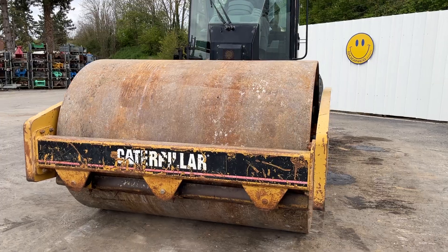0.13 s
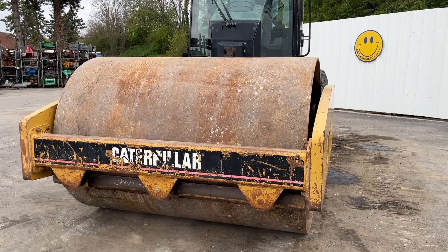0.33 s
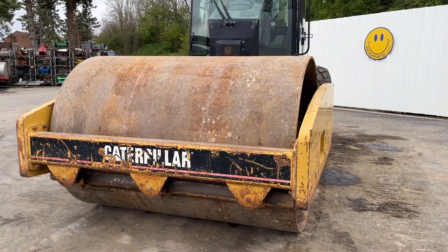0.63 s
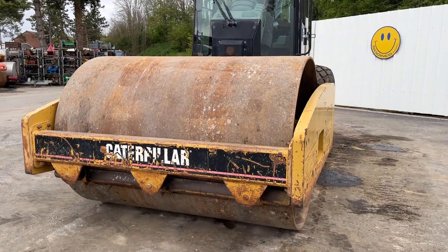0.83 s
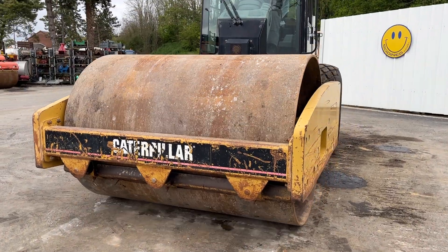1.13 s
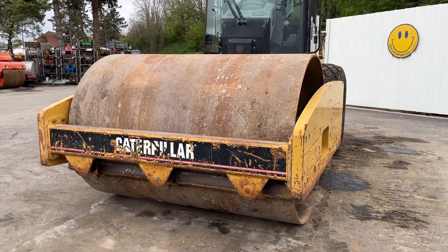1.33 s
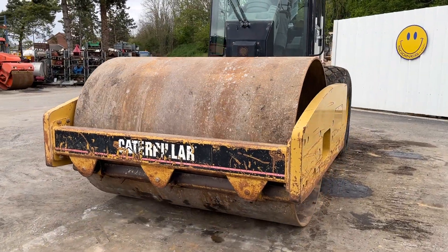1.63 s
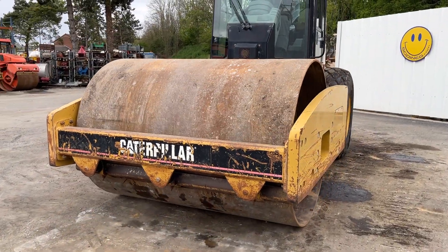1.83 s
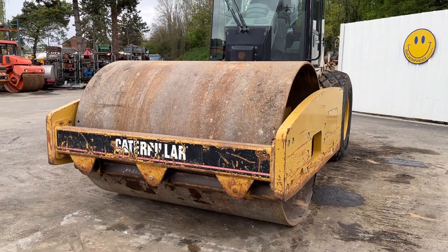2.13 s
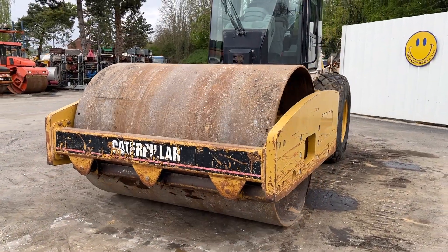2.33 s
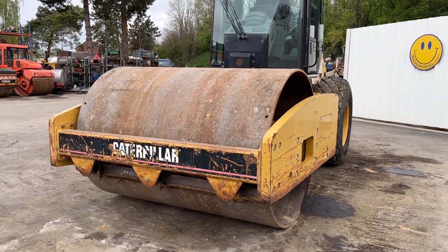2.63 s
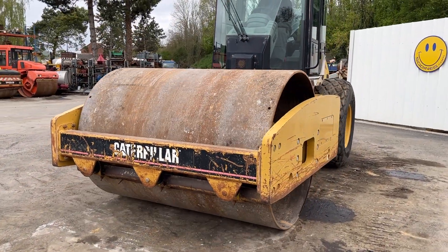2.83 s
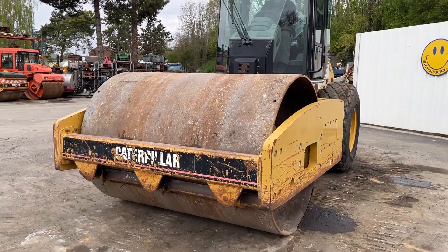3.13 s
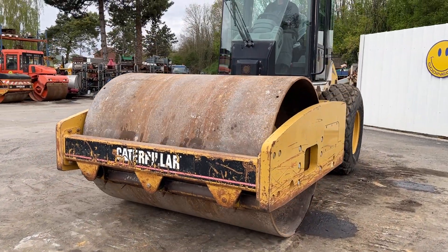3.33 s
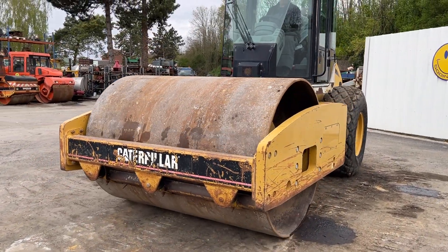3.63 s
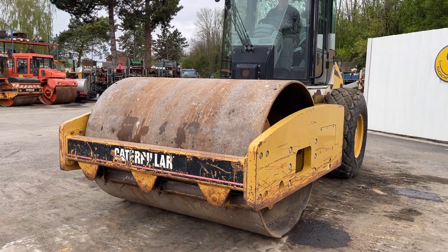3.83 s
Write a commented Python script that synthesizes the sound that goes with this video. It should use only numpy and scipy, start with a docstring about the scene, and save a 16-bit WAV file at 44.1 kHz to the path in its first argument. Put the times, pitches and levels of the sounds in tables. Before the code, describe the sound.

Close outdoor stereo pickup of a heavy roller: quiet steady engine first, small stone ticks midway, then a sudden rush of hollow metallic booming, ringing thuds, crunching stones and deep frame shudder until the end.

```python
"""A diesel road roller creeps over a concrete yard, close to the microphone.
First its engine and hydraulic pump hum and sag a little as they take the load: sines locked to one shaft,
with noisy clatter. From 1.7 s a pebble knocks and grit pops; just before 3 s the drum groans.
Near 3 s the hollow steel drum reaches rough ground: random grains, bumps and cracking stones drive
its decaying modes, so it booms and rings, while the heavy frame shudders and heaves."""
import sys
import numpy as np
from scipy import signal
from scipy.fft import rfft, irfft
from scipy.io import wavfile

SR = 44100
rng = np.random.default_rng(int(sys.argv[2]) if len(sys.argv) > 2 else 0)


def generate_wav(signal):
    """Clip the signal to [-1, 1] and save it as 16-bit WAV at the path in sys.argv[1]."""
    frames = np.transpose(np.atleast_2d(signal))
    scaled = np.clip(frames, -1, 1) * 32767
    pcm = np.round(scaled).astype(np.int16)
    wavfile.write(sys.argv[1], SR, pcm)


N = 176400
T = np.arange(N) / SR


def amp(db):
    """Decibels to gain."""
    return 10 ** (np.asarray(db) / 20)


def evened(x):
    """Scales to rms 1."""
    return x / np.sqrt(np.mean(x ** 2) + 1e-20)


def unit(x):
    """Scales a response to energy 1 per channel, on average."""
    return evened(x) / np.sqrt(x.shape[-1])


def curve(rows, axis=1):
    """One column of a time table, at every sample."""
    rows = np.array(rows)
    return np.interp(T, rows[:, 0], rows[:, axis])


def read(points, hz):
    """Reads a spectrum on a log-frequency axis."""
    f, value = np.transpose(points)
    return np.interp(np.log(hz + 1), np.log(f + 1), value)


def drift(hz):
    """Slow random motion, mostly below the given rate."""
    f = np.fft.rfftfreq(N, 1 / SR)
    return evened(irfft(rfft(rng.standard_normal(N)) / (1 + (f / hz) ** 4), N))


def through(x, response):
    """Plays a signal through a one- or two-channel response."""
    return signal.fftconvolve(np.atleast_2d(x), np.atleast_2d(response), axes=1)[:, :N]


def colour(x, points, size=4096):
    """Causal minimum-phase filter with the given spectrum."""
    log_gain = np.log(amp(read(points, abs(np.fft.fftfreq(size, 1 / SR)))))
    minimum_phase = np.exp(np.conj(signal.hilbert(log_gain)))
    return through(x, np.fft.ifft(minimum_phase).real[:size // 2])


# likeness of the noise at the two microphone ports: pitch_hz, likeness (0 to 1)
PORT_LIKENESS = [(60, 1), (170, 0.86), (370, 0.51), (930, 0.38), (2320, 1), (5800, 0.49), (14500, 0.5)]


def pair(size):
    """Noise at the two ports, alike in the bass and by varying degrees higher up."""
    a, b = rfft(rng.standard_normal((2, size)))
    same = np.clip(read(PORT_LIKENESS, np.fft.rfftfreq(size, 1 / SR)), 0, 1)
    return irfft(np.array([a, same * a + np.sqrt(1 - same ** 2) * b]), size)


def wash(points, t60, direct, size=12000):
    """A direct click and a dense dying tail, with the given spectrum."""
    tail = unit(pair(size) * amp(-60 * T[:size] / t60))
    tail[:, 0] += direct
    return unit(colour(tail, points))


def ring(modes, port_turn=0.06, size=20000):
    """Sum of dying modes, slightly out of step at the two ports; dB is a mode's share of the energy."""
    t, ports = T[:size], np.array([[1], [-1]])
    total = 0
    for k, (hz, db, t60) in enumerate(modes):
        turn = ports * port_turn * rng.standard_normal()  # radians
        attack = 1 - np.exp(-t * hz * 2)
        mode = np.sin(2 * np.pi * hz * t + turn) * attack * amp(-60 * t / t60)
        total = total + (-1) ** k * amp(db) * unit(mode)  # neighbours start with opposite signs
    return unit(total)


def grains(per_s, spread_db):
    """Random clicks of uneven size and either sign, at rms 1."""
    size = amp(spread_db * np.minimum(rng.exponential(1, N), 3))
    return evened(size * rng.choice([-1, 1], N) * (rng.random(N) < per_s / SR))


def bursts(rows, length_s, size=1500):
    """A short crumbling burst of force for each row, made of many tiny fractures."""
    fractures_per_s = 9000
    force = np.zeros(N + size)
    for s, db in rows:
        at = int(s * SR)
        fractures = rng.standard_normal(size) * (rng.random(size) < fractures_per_s / SR)
        force[at:at + size] += amp(db) * evened(fractures * np.exp(-T[:size] / length_s))
    return force[:N]


def pushes(rows, length_s, size=200):
    """One clean, brief push for each row, dying exponentially."""
    force = np.zeros(N)
    for s, db in rows:
        force[int(s * SR)] += amp(db)
    return through(force, np.exp(-T[:size] / length_s) / (length_s * SR))[0]


# exhaust note at the firing rate: time_s, level_db
EXHAUST = [(0, -46.5), (.6, -48.5), (1.3, -54), (1.7, -52.5), (2.3, -55), (4, -22.5)]


def exhaust_note(turn, flutter=0.19):
    """One sine per firing, its strength fluttering."""
    return amp(curve(EXHAUST)) * evened(np.sin(turn) * (1 + flutter * drift(30)))


# weaker engine orders: order (multiples of the four-stroke cycle), level_db before the approach
ORDERS = [(7, -65.5), (8, -66), (10, -64), (11, -66.5), (12, -66.5), (18, -71.5), (36, -65.5), (51, -69.5),
          (54, -69.5), (72, -65)]


def engine_orders(cycle, flutter=0.31, twist_rad=.008):
    """Harmonics of the whole engine cycle, wavering in phase with random shaft twist and in strength."""
    total = 0
    for k, db in ORDERS:
        phase = round(k) * (cycle + twist_rad * drift(10)) + 2 * np.pi * rng.random()
        total = total + amp(db) * evened(np.sin(phase) * (1 + flutter * drift(10)))
    return total


# colour of the clatter: pitch_hz, level_db per Hz (relative)
CLATTER = [(18, -90), (30, -43.5), (57, -4.5), (81, -15.5), (104, -15.5), (139, -16), (303, -12.5),
           (363, -3), (393, -31), (695, -19.5), (772, -19), (1330, -13.5), (5270, -52.5), (8200, -37),
           (14900, -52)]


def engine_clatter(turn, cycle, gating=0.053):
    """Noise pulsing gently with each firing and each full cycle."""
    pulse = 1 + gating * np.cos(turn) + 0.13 * np.cos(cycle)
    return amp(-54) * evened(colour(pair(N) * pulse, CLATTER))


# harmonics of the pump whine from the first up: level_db before the swell
PUMP_HARMONICS = [-59.5, -61, -62.5, -66.5]
# the pump's whine swells with its load: time_s, gain_db
PUMP_SWELL = [(0, -1), (.6, -2), (.9, 0), (1.5, -2)]


def pump_whine(turn, per_firing=4.79):
    """The hydraulic pump turns with the engine and whines at a fixed multiple of the firing rate."""
    whine = 0
    for k, db in enumerate(PUMP_HARMONICS, 1):
        whine = whine + amp(db) * evened(np.sin(k * per_firing * turn) * (1 + 0.31 * drift(1.0)))
    return amp(curve(PUMP_SWELL)) * whine


# engine speed: time_s, firings_per_s
FIRING = [(0, 76.4), (.62, 72.8), (1.09, 75.3), (1.55, 74.2), (1.9, 73.6), (4, 73.6)]
# the engine block as the machine comes nearer: time_s, gain_db
NEAR = [(0, -0.5), (1.3, 1.5), (2, 5), (2.5, 9.5), (3, 15.5), (4, 21.5)]


def engine(waver=0.0018, cylinders=4):
    """Exhaust note, engine orders, clatter at each firing and the pump's whine, all on one shaft."""
    turn = 2 * np.pi * np.cumsum(curve(FIRING) * (1 + waver * drift(13.0))) / SR
    cycle = turn / cylinders
    block = engine_orders(cycle) + engine_clatter(turn, cycle)
    return exhaust_note(turn) + pump_whine(turn) + amp(curve(NEAR)) * block


# small sharp pops of grit: start_s, force_db
POPS = [(1.725, -64), (1.753, -63), (2.192, -62.5), (2.394, -58.5), (3.309, -54.5), (3.355, -51),
        (3.708, -48)]
# colour of a pop: pitch_hz, level_db per Hz (relative)
POP_COLOUR = [(1000, -20), (3000, -15.5), (5200, 2.5), (7000, -1.5), (11000, 4), (15000, -16)]


def pops():
    """Tiny stones shatter brightly without moving the drum."""
    return through(bursts(POPS, length_s=0.0029), wash(POP_COLOUR, t60=.06, direct=1.6)) * amp(-3.0)


# mode of the drum under the pebble: pitch_hz, level_db, t60_s
KNOCK_MODES = [(702, 0, 0.11)]


def pebble_knock(push_s):
    """One early pebble knocks on the drum: a brief push rings a single mode."""
    at_s, force_db = 1.739, -11
    return through(pushes([(at_s, force_db)], push_s), ring(KNOCK_MODES))


# the drum groans as it meets rough ground: start_s, length_s, force_db
GROANS = [(2.715, .022, -37), (2.82, 0.028, -34), (2.878, 0.053, -30.5), (2.927, .08, -31.5)]


def groan(damping=3):
    """Short spells of grinding excite the drum's middle modes, damped to ring shorter."""
    low_hz, high_hz = 650, 900
    modes = [(hz, db, t60 / damping) for hz, db, t60 in RING_MODES if low_hz < hz < high_hz]
    spells = sum(amp(db) * ((T > s) & (T < s + length)) for s, length, db in GROANS)
    return through(grains(per_s=1500, spread_db=3) * spells, ring(modes))


# modes of the frame: pitch_hz, level_db, t60_s
FRAME_MODES = [(49.4, -7.5, 1), (73.2, 0, 0.63), (98.7, -5, 0.087), (119.2, -3, 0.081)]
# shudder of the heavy frame: time_s, level_db
SHUDDER = [(0, -75), (2.78, -54), (3.25, -25), (4, -27)]


def frame_shudder(ground):
    """The rough ground shakes the deep modes of the heavy frame."""
    return evened(through(ground, ring(FRAME_MODES))) * amp(curve(SHUDDER))


# jolts of the frame: centre_s, peak_db
JOLTS = [(2.934, -28), (2.98, -27.5), (3.03, -26.5), (3.084, -19.5), (3.137, -14.5), (3.192, -18),
         (3.646, -10), (3.692, -9.5), (3.847, -11), (3.893, -9.5)]


def jolts(hz=71, width_s=0.0083):
    """The heavy frame heaves for a cycle or two each time the drum lurches."""
    total = 0
    for s, db in JOLTS:
        t = T - s
        total = total + amp(db) * np.exp(-(t / width_s) ** 2) * np.cos(2 * np.pi * hz * t)
    return total


# colour of crushed stone: pitch_hz, level_db per Hz (relative)
CRUSH = [(200, 1.5), (700, 12), (1700, 5.5), (3200, -3.5), (3900, -11), (5600, -11), (7200, -17),
         (11000, -27.5), (15000, -33.5)]
# bright modes of the rim: pitch_hz, level_db, t60_s
RIM_MODES = [(2270, -1, 0.1), (2775, -1, 0.082), (2938, 0, 0.056), (2055, 0, .04)]


def crushed_stones(grit, cracks):
    """Grit and cracking stones crunch in a short wash; the cracks also ring the drum's rim."""
    crunch = through(grit + cracks, wash(CRUSH, t60=0.097, direct=0.66))
    return crunch + amp(-9) * through(cracks, ring(RIM_MODES))


# colour of the drum's many crowded modes: pitch_hz, level_db per Hz (relative)
SHELL = [(60, -19), (170, 3), (260, 4.5), (420, 1), (600, -2.5), (780, 2), (1050, -8.5), (1350, -8),
         (1750, -27.5), (3000, -34.5), (6000, -51), (15000, -65.5)]


def drum_shell(rolling):
    """The drum's modes crowd together into a very short wash."""
    return amp(-3) * through(rolling, wash(SHELL, t60=0.02, direct=0.84))


# high modes of the drum: pitch_hz, level_db, t60_s
RING_MODES = [(464.7, -0.5, 0.11), (523, -5, 0.4), (569, -19.5, 0.27), (666.7, 1, 0.2), (717.5, -3, 0.097),
              (736.8, 4, 0.25), (845.4, 2, 1), (932, -3.5, 0.64), (956.3, -9.5, 0.12), (1115, -7, 0.1),
              (1274, -13, 0.25), (1492, -18, 0.23)]


def drum_ring(rolling, snaps):
    """Rolling and the snap of each bump ring the hollow steel."""
    return amp(-2) * through(rolling + amp(19) * snaps, ring(RING_MODES))


# low modes of the drum: pitch_hz, level_db, t60_s
BOOM_MODES = [(230.4, 0.5, 0.25), (247, -1, 0.2), (271.8, -3, .16), (303, -6.5, 0.13), (325.1, 1, 0.26),
              (338, -2, 0.12)]


def drum_boom(rumble, drops):
    """Rolling and the drop of each bump boom in the drum's low modes."""
    return through(rumble + amp(24.5) * drops, ring(BOOM_MODES))


def sweep(size=4000):
    """Bending waves in steel bring the treble first, so each bump chirps downwards."""
    from_hz, to_hz, fall_s, decay_s = 1350, 290, .005, .007
    t = T[:size]
    hz = to_hz + (from_hz - to_hz) * np.exp(-t / fall_s)
    return unit(np.sin(2 * np.pi * np.cumsum(hz) / SR) * np.exp(-t / decay_s))


# colour of one bump's thud: pitch_hz, level_db per Hz (relative)
THUD = [(80, -30), (260, -6), (500, 3.5), (850, 5), (1300, -11), (1800, -45.5), (4000, -43), (15000, -65.5)]


def bump_thuds(snaps):
    """Each snap gives a dull, quickly dying thud and a falling chirp."""
    thud = amp(23) * through(snaps, wash(THUD, t60=0.022, direct=5.3))
    return thud + amp(23) * through(snaps, sweep())


# bumps of the drum over stones: start_s, snap_db, boom_db (both as force)
BUMPS = [(3.064, -18, -12.5), (3.12, -17.5, -16), (3.175, -16.5, -8), (3.217, -20, -11.5),
         (3.256, -17.5, -9), (3.304, -20, -12.5), (3.365, -16.5, -10.5), (3.399, -15, -11.5),
         (3.44, -18.5, -31), (3.483, -23, -27), (3.536, -13.5, -6.5), (3.578, -26.5, -10),
         (3.661, -19.5, -7), (3.76, -20, -12.5), (3.831, -20.5, -20.5), (3.924, -15.5, -7.5)]


def pressure():
    """Each bump presses the drum harder on the ground; between bumps it rides light."""
    light, hard, decay_s = .5, 1.3, .014
    press = sum((T >= s) * np.exp(-abs(T - s) / decay_s) for s, _, _ in BUMPS)
    return np.where(T < BUMPS[0][0], 1, light + hard * press)


# rolling of the drum: time_s, boom_db, ring_db, grit_db (all as force)
ROLL = [(0, -104, -62, -58.5), (1.5, -72, -68.5, -58), (2.6, -53.5, -51.5, -48.5),
        (2.85, -44.5, -44, -45.5), (3.16, -19.5, -22.5, -45.5), (3.55, -15.5, -22, -41),
        (4, -16, -16.5, -51.5)]
# stones cracking under the drum: start_s, force_db
CRACKS = [(1.725, -56.5), (1.740, -55), (1.753, -53.5), (1.875, -55.5), (2.192, -59), (2.880, -46),
          (2.931, -46.5), (3.035, -48), (3.083, -46), (3.13, -46.5), (3.178, -37), (3.309, -52),
          (3.355, -27), (3.361, -51.5), (3.448, -36.5), (3.536, -33), (3.548, -38), (3.572, -31),
          (3.708, -26), (3.714, -38.5), (3.746, -33.5), (3.786, -37), (3.883, -33.5), (3.917, -37),
          (3.957, -41.5)]


def drum(lumpy_db=0.8, push_s=0.00021):
    """Rough ground, bumps and breaking stones drive the steel drum and its frame."""
    lumps = evened(amp(lumpy_db * drift(41)))
    ground = grains(per_s=1200, spread_db=3.5) * pressure() * lumps
    grit = grains(per_s=2500, spread_db=4.0) * pressure() * amp(curve(ROLL, axis=3))
    snaps = pushes([(s, snap_db) for s, snap_db, _ in BUMPS], push_s)
    drops = pushes([(s, boom_db) for s, _, boom_db in BUMPS], push_s)
    cracks = bursts(CRACKS, length_s=0.0092)
    rumble = ground * amp(curve(ROLL, axis=1))
    rolling = ground * amp(curve(ROLL, axis=2)) + amp(0.5) * cracks
    steel = drum_shell(rolling) + drum_ring(rolling, snaps) + drum_boom(rumble, drops)
    contact = bump_thuds(snaps) + crushed_stones(grit, cracks) + pebble_knock(push_s)
    return steel + contact + frame_shudder(ground)


def scene():
    """The engine behind the rolling drum."""
    return engine() + pops() + groan() + jolts() + drum()


# level of the first microphone port over the second: pitch_hz, level_db
BALANCE = [(60, 0.4), (370, 1.5), (690, -1.5), (1260, -2.5), (2320, 1.5), (4270, 6.5), (7860, 0),
           (14500, -0.5)]
# phase of the first port ahead of the second: pitch_hz, lead_rad
LEAD = [(30, 0.5), (400, -0.26), (950, 0.17), (1460, 0.95), (1900, 1.52), (4500, 0.07), (7500, -3),
        (14000, -0.1)]
# a notch in the microphone's treble: pitch_hz, gain_db
NOTCH = [(6800, 0.5), (7700, -9), (8400, -34), (9400, -6), (10000, -5.5), (13800, -1.5), (15200, -9.5)]


def record(dry):
    """Level and phase differences between the ports, a treble notch, a low cut and the band limit."""
    low_cut_hz, edge_hz = 38, 15000
    hz = np.fft.rfftfreq(2 * N, 1 / SR)
    half = amp(read(BALANCE, hz) / 2) * np.exp(.5j * read(LEAD, hz))  # each port takes half the difference
    ports = np.array([half, 1 / half]) * amp(read(NOTCH, hz))
    x = irfft(rfft(dry, 2 * N) * ports)[:, :N]
    x = signal.sosfilt(signal.butter(6, low_cut_hz, "high", fs=SR, output="sos"), x)
    band_limit = signal.firwin(511, edge_hz, window=("kaiser", 9), fs=SR)
    return signal.oaconvolve(x, band_limit[None], "same")


dry = scene()
out = record(dry)
generate_wav(out)
```